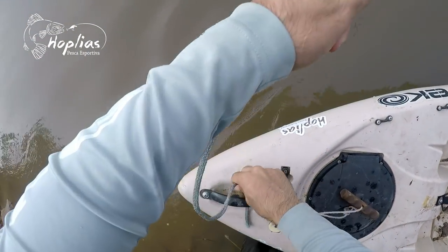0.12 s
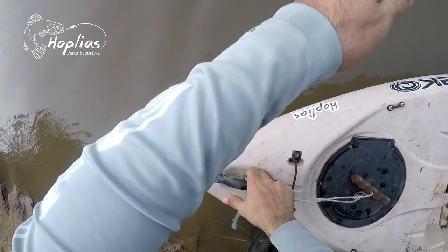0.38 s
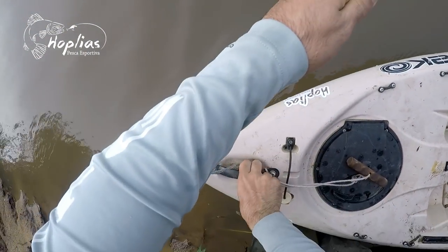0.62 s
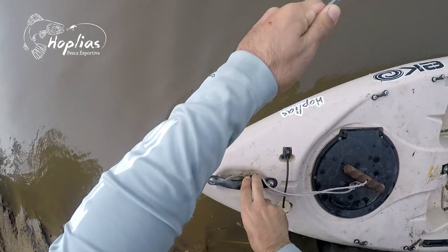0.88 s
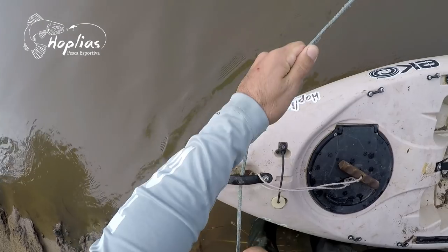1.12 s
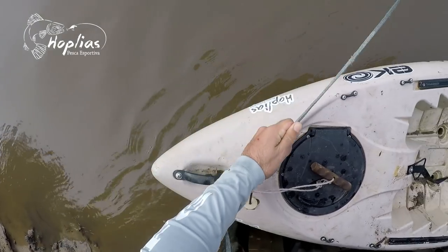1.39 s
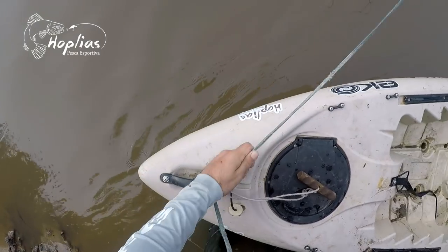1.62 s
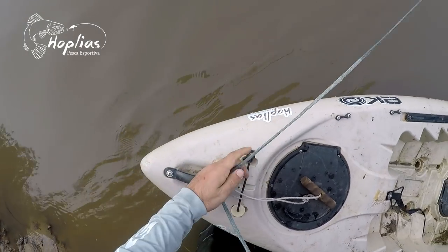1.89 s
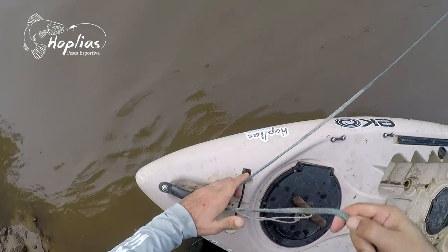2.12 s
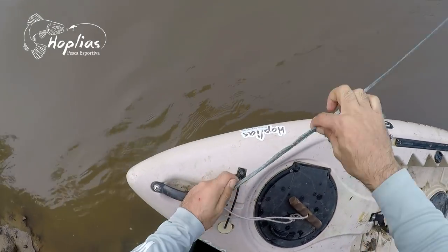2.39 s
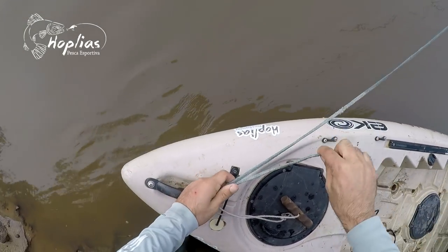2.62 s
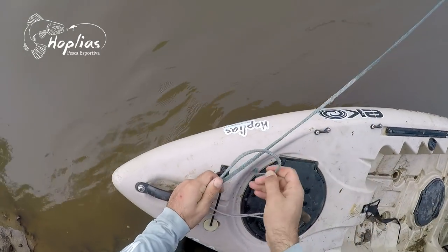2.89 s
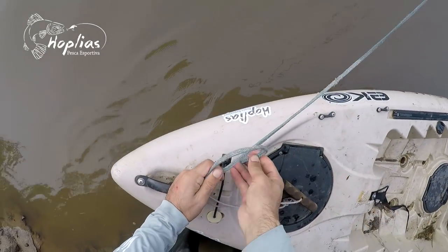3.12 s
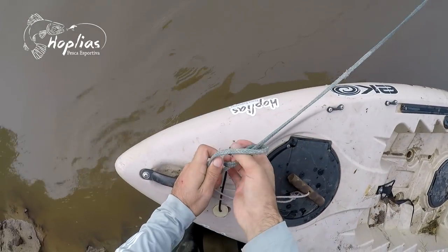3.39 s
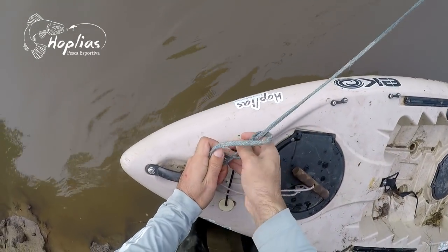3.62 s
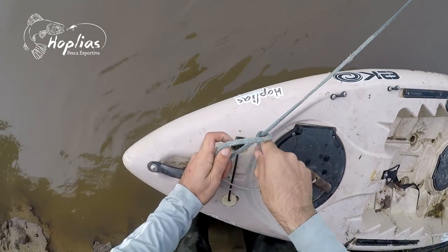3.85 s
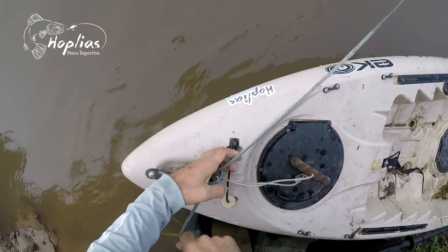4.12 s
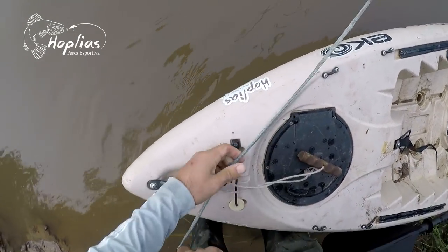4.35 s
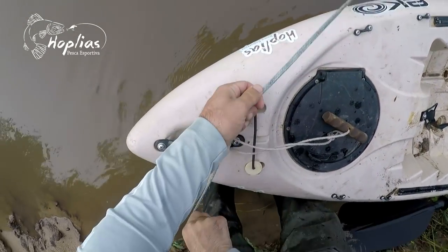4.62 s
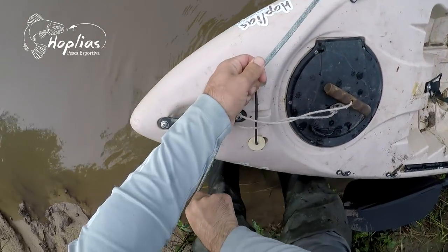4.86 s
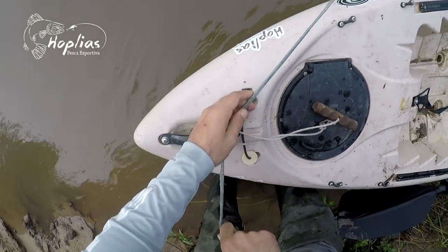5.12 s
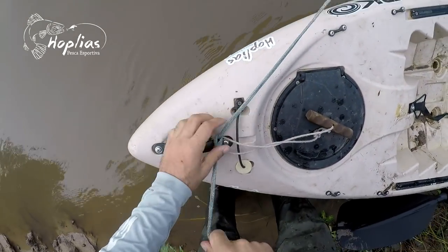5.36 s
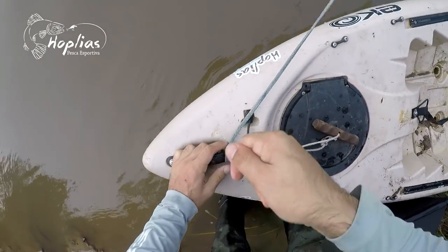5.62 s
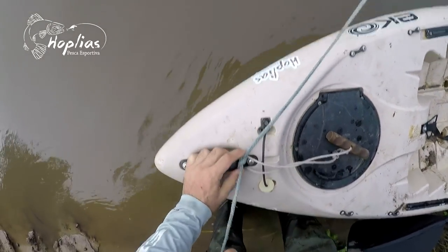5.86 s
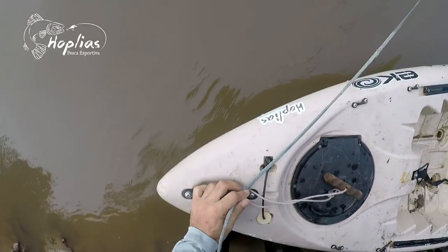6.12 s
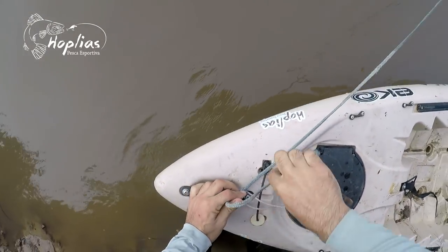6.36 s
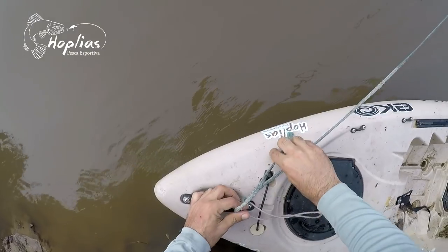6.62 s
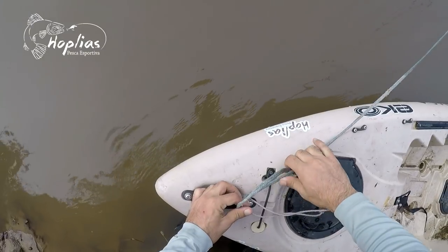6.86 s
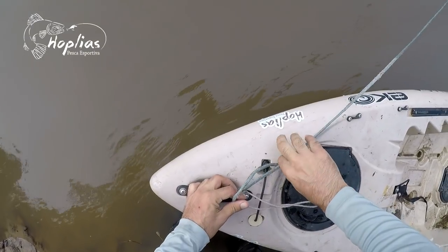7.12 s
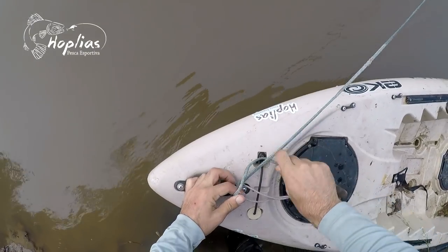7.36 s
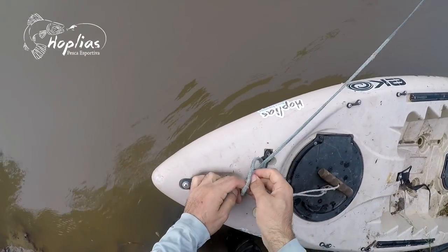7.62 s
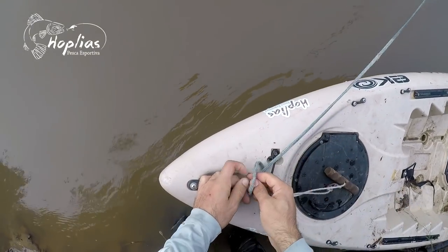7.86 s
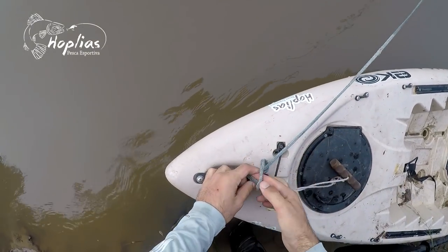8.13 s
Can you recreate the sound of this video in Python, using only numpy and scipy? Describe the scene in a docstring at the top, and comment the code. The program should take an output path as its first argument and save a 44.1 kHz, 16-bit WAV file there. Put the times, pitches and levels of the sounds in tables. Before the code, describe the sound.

A quiet riverbank in open air, heard through a sealed body-worn microphone: low, soft river hush, a very faint insect band and slight deep rumble that settles. At 0.06 s a small bird whistle arches up and down. From 0.5 to 3 s there are muffled bumps, a hollow hull knock near 0.95, a soft rope rub at 1.1-1.35, and ticks and knocks around 1.6 and 2.3. A crisp plastic click falls at 3.4, rope scuffs near 3.9. Heavy boxy thumps hit at 4.1 and hardest at 4.3, then 5.1, with a hollow knock at 4.7. From 5.5 to 6.1 jolts crowd into a lumpy rumble with scraping and clicks; bright clinks at 5.9 and 6.2. Then calmer: hull knocks at 6.3 and 7.0, faint chirps at 6.4-6.9, a flurry of light ticks at 7.2-7.65, and soft bumps to just past 8.

```python
"""A quiet river bank, where hands thread and knot a rope on a plastic kayak, heard by a body-worn camera.
Jolts and tremor of the camera housing are decaying modes; hollow knocks are modes of the hull.
Ticks, clinks and rubbing of the rope are strikes, rattles and crackling noise through resonances.
Birds are gliding tones; river, far insects and a deep rumble are filtered noise."""
import sys
import numpy as np
from scipy import signal
from scipy.fft import rfft, irfft
from scipy.io import wavfile
from scipy.ndimage import uniform_filter1d

SR = 44100
rng = np.random.default_rng(int(sys.argv[2]) if len(sys.argv) > 2 else 0)


def transcribe(u):
    """Save the signal u as a 16-bit wav file named by the first command-line argument.

    u: samples, shape (n,) or (channels, n), limited to [-1, 1]; the rate is SR.
    q: integer samples, one column per channel.
    """
    v = np.clip(np.atleast_2d(u).T, -1, 1)
    q = np.round(v * 32767).astype(np.int16)
    wavfile.write(sys.argv[1], SR, q)


def to_linear_factor(level_db):
    """Convert decibel levels (scalar or array-like) to linear amplitude factors."""
    exponent = np.asarray(level_db, float) / 20
    return 10 ** exponent


N = 363384

# Modes of the camera housing. Each row: nominal frequency in Hz, 60 dB decay time in seconds,
# right level in dB, left level in dB, left phase lag in radians. From the fifth row on: upper modes.
HOUSING = [(165.4, 0.054, -11, -12.5, 1.24), (229.9, 0.05, 2, -8, 1.92), (294.7, 0.039, -0.5, -9.5, 1.96),
           (390, 0.042, -7.5, -7, 3.78), (596, 0.02, -3.5, -4, 3.02), (724, 0.012, -3.5, -5, 2.88),
           (886, 0.0096, -2.5, -4.5, 2.96), (1201, 0.012, -9.5, -12, 2.87), (1800, 0.007, -19, -14.5, 3.12)]
# The microphone pair for sound from the air. Each row: frequency in Hz, likeness of the two sides (0-1),
# phase lead of the right in radians, left-to-right level in dB.
PORTS = [(60, .2, 1.5, -2), (170, .4, 2.1, -4.5), (340, .3, 2.7, -2), (600, .85, 3.1, -1.5),
         (1100, .8, 3.25, -.4), (2000, .35, 3.9, 0), (3000, .3, 5.6, .3), (3900, .6, 6.3, -.7),
         (5200, .2, 9.2, -.7), (8500, .05, 9.2, -2.5)]


def evened(x):
    """Normalisation to an rms of 1."""
    return x / np.sqrt(np.mean(x ** 2) + 1e-20)


def read(hz, points, column=1):
    """Linear interpolation of a table column along a logarithmic frequency axis."""
    points = np.array(points)
    return np.interp(np.log(hz + 1), np.log(points[:, 0] + 1), points[:, column])


def add(mix, s, sound, pan_db=0):
    """Superposition of a sound at time s, with pan_db of left-to-right level difference."""
    part = mix[:, round(s * SR):][:, :sound.shape[-1]]
    sides = to_linear_factor([[pan_db / 2], [-pan_db / 2]])
    part += (sides * sound)[:, :part.shape[1]]


def sparks(per_s, spread_db):
    """Random impulse train: clicks of random sign and exponentially spread level, a few large."""
    size = to_linear_factor(spread_db * np.minimum(rng.exponential(1, N), 4))
    sign = rng.choice([-1., 1.], N)
    return size * sign * (rng.random(N) < per_s / SR)


def detuned(shift, both, apart):
    """Modal detuning: one part shared by both sides, one for each side that shrinks for upper modes."""
    hz = np.array(HOUSING)[:, 0]
    return 1 + both * shift[0] + apart * shift[1:] * 250 / np.maximum(hz, 250)


def housing_ring(detune, rise):
    """Modal decay of the pushed housing; the two microphones shake nearly opposite ways."""
    t = np.arange(3000) / SR
    hz, t60, right_db, left_db, lag = np.transpose(HOUSING)[:, :, None]
    phase = 2 * np.pi * hz * detune[..., None] * t
    fade = to_linear_factor(-60 * t / t60) * (1 - np.exp(-t / rise))
    fade *= 1 + 1.5 * np.exp(-t / .008)  # the first swing is the hardest
    left = to_linear_factor(left_db) * np.sin(phase[0] - lag)
    right = to_linear_factor(right_db) * np.sin(phase[1])
    rings = np.array([left, right]) * fade
    low, high = rings[:, :4].sum(1), rings[:, 4:].sum(1)
    # unit peak midway between the sides; the floor guards upper modes that cancel there
    high_peak = max(abs(high.mean(0)).max(), abs(high).max() / 5)
    return low / abs(low.mean(0)).max(), high / high_peak


def jolts():
    """Impulsive excitation of the housing modes: a slower push excites the upper modes less."""
    # Clear thumps. Each row: start in seconds, peak of the lower modes in dB, upper modes in dB on top.
    thumps = [(0.059, -42, -9), (0.075, -37.5, -34), (0.485, -34, -12), (0.617, -34.5, -14),
              (0.651, -32.5, -16), (0.674, -28, -22), (0.697, -37.5, -12), (0.916, -32, -15),
              (1.039, -38.5, -7.5), (1.098, -35.5, -19), (1.298, -37, -4), (1.362, -30.5, -11),
              (1.43, -35, -11), (1.505, -30, -14.5), (1.597, -30.5, -21), (1.794, -29.5, -7),
              (1.875, -25, -9), (1.903, -34, -10), (1.957, -44, -27), (2.036, -27, -14.5),
              (2.162, -34.5, -18), (2.252, -36, -12), (2.303, -33.5, -8.5), (2.429, -32.5, -10),
              (2.456, -27.5, -12.5), (2.591, -31, -9.5), (2.656, -32, -10), (2.794, -35.5, -24),
              (2.938, -33, -18), (3.023, -30.5, -16), (3.291, -39, -10), (3.717, -31.5, -11),
              (3.983, -30, -8.5), (4.038, -29, -9), (4.118, -13.5, -11), (4.17, -29, -12),
              (4.185, -22.5, -11.5), (4.202, -24, -19), (4.243, -40, -9), (4.263, -40, 1), (4.288, -9, -14),
              (4.298, -8, -12), (4.377, -24, -11), (4.392, -21.5, -17), (4.409, -18.5, -17),
              (4.422, -27, -13), (4.452, -27.5, -12.5), (4.487, -26.5, -12), (4.527, -39, -13),
              (4.673, -30, -18), (4.718, -26, -15), (4.834, -30, -17.5), (4.893, -26, -12.5),
              (4.911, -28, -12.5), (4.944, -29, -12.5), (5.084, -33, -15), (5.127, -13.5, -9.5),
              (5.216, -30, -15), (5.267, -19, -9), (5.318, -34, -13), (5.412, -32.5, -21),
              (5.443, -33.5, -18), (5.456, -33, -13), (5.488, -20.5, -5), (5.596, -25, -17),
              (5.611, -11, -15), (5.63, -19, -11), (5.649, -24, -12), (5.674, -27, -17), (5.685, -17, -20),
              (5.699, -19, -18), (5.714, -20, -25), (5.736, -17, -11), (5.793, -21.5, -14), (5.813, -9, -7),
              (5.834, -15.5, -17), (5.847, -19.5, -13), (5.875, -27, -13), (5.89, -28, -3),
              (5.902, -21.5, -15), (5.914, -21, -13), (5.937, -36, -4), (5.952, -17.5, -15),
              (5.982, -11, -16.5), (5.994, -11.5, -15), (6.044, -23, -18), (6.068, -18, -16),
              (6.097, -25, -17), (6.113, -29.5, -16), (6.547, -30, -6), (6.596, -28, -15),
              (6.655, -29.5, -11), (6.721, -32.5, -7.5), (6.752, -34, -16), (6.855, -40, -26),
              (6.986, -33.5, -13), (7.096, -28.5, -11.5), (7.156, -33.5, -20), (7.212, -33, -20),
              (7.307, -29, -9.5), (7.387, -32, -11), (7.556, -35, -14), (7.764, -31.5, -9.5),
              (8.038, -32.5, -13), (8.087, -35, -14), (8.133, -32.5, -11), (8.171, -29.5, -13)]
    out = np.zeros((2, N))
    shifts = rng.standard_normal((len(thumps), 4, len(HOUSING)))
    for (s, db, upper_db), shift in zip(thumps, shifts):
        rise = 0.0018 * to_linear_factor(-.6 * (upper_db + 1.0))
        low, high = housing_ring(detuned(shift[:3], 0.084, 0.035), rise)
        pan_db = -3 + 3 * shift[3, 0]
        add(out, s, to_linear_factor(db) * (low + to_linear_factor(upper_db) * high), pan_db)
    return out


def tremor():
    """Convolution of dense random pushes with the housing modes gives a lumpy rumble."""
    # Course of the rumble. Each row: time in seconds, level in dB.
    course = [(0.0, -46.5), (0.34, -63.5), (0.82, -41.5), (1.05, -46.5), (1.86, -50), (1.97, -40),
              (3.26, -63), (3.69, -49.5), (4.01, -39), (4.07, -47), (4.1, -26.5), (4.16, -37.5),
              (4.27, -28), (4.4, -28.5), (4.53, -39.5), (4.7, -35), (5.12, -45.5), (5.3, -39), (5.42, -33),
              (5.53, -36.5), (5.58, -39), (5.665, -36), (5.72, -24), (5.77, -31), (5.9, -27), (5.94, -32),
              (6.0, -26), (6.035, -32.5), (6.09, -29.5), (6.135, -39.5), (6.4, -44), (6.54, -41.5),
              (7.0, -57), (7.48, -41.5), (7.82, -49.5), (8.06, -70), (8.24, -37)]
    out = np.zeros((2, N))
    for shift in rng.standard_normal((4, 3, len(HOUSING))):
        shared = sparks(90, 4.5)
        pushes = np.array([0.8 * shared + 0.96 * sparks(110, 4.5), shared])
        rings = housing_ring(detuned(shift, 0.065, 0.071), rise=0.0012)
        low, high = (evened(signal.oaconvolve(pushes, ring, axes=1)[:, :N]) for ring in rings)
        out += low + to_linear_factor(-9.5) * high
    s, db = np.transpose(course)
    level = to_linear_factor(np.interp(np.arange(N) / SR, s, db))
    return level * out / 2  # four layers add up to twice the rms


def knocks():
    """Modal radiation of the hollow hull, in phase at both microphones; the rope bounces a few times."""
    # Strikes. Each row: start in seconds, peak in dB, base frequency in Hz, left-to-right level in dB.
    strikes = [(0.953, -27, 528, -1), (0.967, -38.5, 550, 3), (1.58, -33.5, 596, 4), (1.586, -32, 408, 6),
               (1.607, -40.5, 490, 2), (2.117, -33.5, 445, 3), (2.288, -28.5, 445, 5),
               (2.296, -39, 692, -3), (3.408, -44.5, 523, 5), (4.09, -30, 563, -2), (4.455, -32, 392, 0),
               (4.695, -24.5, 537, 2), (6.198, -38, 537, -2), (6.323, -31, 493, 2), (6.338, -38, 480, -3),
               (6.366, -29, 399, 5), (6.987, -26.5, 451, 7), (7.022, -34, 390, 7)]
    # Hull modes. Each row: multiple of the base frequency, level in dB, 60 dB decay time in seconds.
    hull = [(0.998, 3, 0.043), (1.2, -13.5, 0.095), (1.45, -9, 0.012), (2.2, -23, 0.089), (3.1, -5, 0.0043),
            (4.4, -25, 0.011)]
    out, t = np.zeros((2, N)), np.arange(3000) / SR
    chances = rng.random((len(strikes), 5, 2))
    for (s, db, hz, pan_db), bounces in zip(strikes, chances):
        ring = sum(to_linear_factor(a - 60 * t / t60) * np.sin(2 * np.pi * hz * k * t) for k, a, t60 in hull)
        ring = ring[None] * (1 - np.exp(-t / .0009))
        ring = ring / abs(ring).max()
        add(out, s, to_linear_factor(db) * ring, pan_db)
        for late, size in bounces:  # later bounces are weaker
            add(out, s + .005 + .035 * late, to_linear_factor(db - 7 - 16 * late) * size * ring, pan_db)
    return out


def snap(rattle, hz, width_hz, tail_db):
    """Resonant filtering of a strike and a short dying rattle, scaled to unit peak."""
    snap_s, tail_t60_s = .0008, 0.042
    t = np.arange(rattle.shape[1]) / SR
    dying = np.exp(-((t - snap_s) / snap_s) ** 2) + to_linear_factor(tail_db - 60 * t / tail_t60_s)
    ring = (rattle[0] + .5 * rattle[1:]) * dying * (1 - np.exp(-t / 0.0003))
    ring[:, round(snap_s * SR)] += 9  # the clean strike inside the rattle
    r = np.exp(-np.pi * 1.3 * max(width_hz, 50) / SR)  # pole radius
    for zeros in [1, -1], [1]:  # twice, for steep flanks
        ring = signal.lfilter(zeros, [1, -2 * r * np.cos(2 * np.pi * hz / SR), r * r], ring)
    return ring / abs(ring.mean(0)).max()


def ticks():
    """Broad resonance of plastic struck by rope, buckle and fingers, with a bright edge on top."""
    # Contacts. Each row: start in seconds, peak of the body in dB, centre in Hz,
    # bright edge in dB on top of that, left-to-right level in dB.
    contacts = [(0.059, -49, 1600, -7, -2), (0.645, -47, 2060, -6, -2.5), (0.9183, -45, 1920, -10, -12),
                (0.9532, -47, 2250, -6, -20), (1.545, -41.5, 1000, -25, 0), (1.559, -40, 2780, -21, -2),
                (1.8202, -41, 3680, -8, -7), (1.886, -39.5, 1710, -22, 2), (1.982, -53, 1800, -20, 0),
                (2.11, -44, 1880, -11, -10), (2.2614, -37, 1430, -9, -2), (2.2724, -33.5, 1860, -4.5, -11),
                (2.2864, -40, 2040, -3, -10), (2.6928, -43, 3300, -18, -9), (3.2767, -36.5, 3500, -19, 0),
                (3.195, -43, 1790, -15, 0), (3.396, -49, 2100, -25, 0), (3.4053, -28, 2380, -22, 1.0),
                (3.4108, -37.5, 2560, -25, 1), (4.083, -33, 3230, -8, -4), (4.091, -41, 3400, 0, 1),
                (4.119, -32.5, 1880, -0.5, -8), (4.1723, -41, 1540, -19, -1),
                (4.2888, -35.5, 1520, 3.5, -12), (4.3679, -30.5, 1500, -12.5, -6),
                (4.575, -32, 1790, -22, -1), (4.693, -38, 2100, -12, 0), (4.6983, -32.5, 2200, -7, -7),
                (4.704, -39, 2290, -10, -5), (5.012, -39, 1800, -24, 3), (5.0095, -37, 3070, -29, -5),
                (5.129, -33.5, 1530, 1.5, -10), (5.2673, -33, 1920, -5.5, 0),
                (5.3082, -32.5, 3130, -24, -3), (5.308, -33.5, 2100, -25, 5), (5.334, -55, 4200, -6, 0),
                (5.3624, -34, 3250, -23, 1.5), (5.375, -33, 1370, -16, 2), (5.3954, -37, 3700, -12, -1.0),
                (5.405, -40, 1460, -0.5, 1), (5.485, -48, 4180, 0, 2), (5.4902, -32, 1870, -2.5, -8),
                (5.612, -35.5, 1820, -12, 6), (5.7375, -36, 1700, -6, -14), (5.7718, -52, 1490, 8, 0),
                (5.8046, -32, 2100, -8, -6), (5.815, -27.5, 2350, -9, -4), (5.834, -44.5, 2300, 7, -11),
                (5.9826, -31.5, 1250, -1.5, -10), (5.995, -34, 1800, -15, 0), (6.1578, -40, 1440, -3, 2),
                (6.198, -31, 1800, -15, -10), (6.302, -46, 4200, -5, 0), (6.475, -45, 3600, -8, 0),
                (6.483, -40, 1280, -14, -4), (6.5553, -39.5, 1760, -4, -1), (6.758, -44, 2700, -20, 0),
                (6.782, -45, 3000, -25, -4), (6.9855, -47, 2000, -6, -2), (7.019, -51.5, 1980, 5, 0.5),
                (7.247, -32.5, 2550, -3, 0), (7.2893, -40, 2000, -3.5, 3), (7.3358, -39.5, 2000, -11, -2.0),
                (7.343, -38, 3700, -17, -2), (7.3565, -50, 3600, -15, -2), (7.373, -48, 3400, -12, 0),
                (7.4124, -41, 2700, -4, 4), (7.418, -36, 2900, -12, -1), (7.428, -41, 3740, -17, 1),
                (7.45, -49, 3500, -20, 0), (7.4747, -39, 1870, -17, -1.5), (7.4983, -45, 3870, -9, -6),
                (7.505, -54, 3900, 0, -3), (7.5215, -35.5, 3000, -4, -1), (7.5985, -46, 3900, -3, -1),
                (7.6046, -35.5, 1330, -17, 2), (7.612, -43, 2400, -15, 0), (7.6222, -33, 2400, -28, -3),
                (7.646, -44, 1700, -9, 0), (7.841, -38, 1920, -10, -5), (8.208, -37.5, 1820, -18, -2)]
    # Bright edge. Each row: centre in Hz, nominal width in Hz, level in dB.
    edge_bands = [(3700, 540, -8), (6500, 1700, 3), (9300, 670, -11.5)]
    out = np.zeros((2, N))
    rattles = rng.standard_normal((len(contacts), 1 + len(edge_bands), 3, 1500))
    for (s, db, hz, edge_db, pan_db), rattle in zip(contacts, rattles):
        edge = sum(to_linear_factor(a) * snap(r, f, w, tail_db=-7.5) for r, (f, w, a) in zip(rattle[1:], edge_bands))
        body = snap(rattle[0], hz, 0.55 * hz, tail_db=-3.5)
        add(out, s, to_linear_factor(db) * (body + to_linear_factor(edge_db) * edge), pan_db)
    return out


def clinks():
    """Narrow resonance of small hard fittings, which gives each strike a pitch."""
    # Strikes. Each row: start in seconds, peak in dB, pitch in Hz, left-to-right level in dB.
    fittings = [(1.558, -43, 1610, -2), (1.822, -48, 3900, -5), (0.646, -46, 2300, -2),
                (2.213, -48, 2000, -5), (4.368, -40.5, 1750, -4), (4.672, -43, 1520, -10),
                (5.8143, -32, 2400, -2), (5.862, -41, 6000, 6), (5.873, -34, 6000, 4),
                (5.882, -30, 6140, 10), (6.213, -40, 6000, 10), (6.225, -26, 5840, 5),
                (6.711, -47, 3700, 0), (7.4278, -49, 3870, 2), (7.5222, -31.5, 1490, -2)]
    out = np.zeros((2, N))
    rattles = rng.standard_normal((len(fittings), 3, 1500))
    for (s, db, hz, pan_db), rattle in zip(fittings, rattles):
        add(out, s, to_linear_factor(db) * snap(rattle / 4, hz, .16 * hz, tail_db=-7.5), pan_db)
    return out


def rub():
    """Stick-slip friction: braid strands catch on edges in a dense crackle with uneven clumps."""
    # Rope and cloth strokes. Each row: start in seconds, end in seconds, rms level in dB,
    # centre in Hz, half-width of the colour in octaves.
    strokes = [(0.632, 0.675, -58.5, 2160, 0.86), (0.741, 0.834, -53.5, 5000, 3.6),
               (0.927, 0.958, -56, 3000, 4.9), (1.12, 1.344, -46.5, 1100, 0.69),
               (1.104, 1.36, -60, 4000, 1.2), (1.477, 1.665, -58, 2960, 1.2), (2.1, 2.125, -53, 2500, 4.4),
               (2.261, 2.31, -54, 1800, 5.9), (2.82, 2.866, -58.5, 5500, 1),
               (5.132, 5.282, -60, 4000, 0.77), (3.28, 3.306, -61, 2500, 2.3),
               (3.833, 3.965, -50.5, 2500, 5.1), (3.932, 4.012, -49, 2500, 4.6),
               (4.069, 4.115, -43.5, 3480, 3.1), (4.168, 4.244, -55, 3500, 1.7),
               (4.367, 4.44, -45.5, 1290, 0.56), (5.258, 5.465, -58.5, 3380, 1.2),
               (5.68, 5.804, -52.5, 1200, 2.1), (5.77, 5.88, -44, 1300, 0.71),
               (5.884, 5.934, -54.5, 2000, 2.3), (5.96, 6.12, -61, 1090, 1.7),
               (6.126, 6.263, -61, 4500, 1.1), (6.63, 6.8, -60.5, 3000, 1.6),
               (7.33, 7.377, -58.5, 3000, 1.1), (7.402, 7.443, -57.5, 3400, 0.53),
               (7.488, 7.516, -52, 3000, 3.8), (7.577, 7.65, -57, 2200, 2.4),
               (7.827, 7.858, -55, 2500, 2.6), (8.19, 8.236, -55.5, 3000, 1.8)]
    shared = sparks(1600, 4.5)
    grains = np.array([shared + .6 * sparks(2500, 3.5) for _ in range(2)])
    grains *= to_linear_factor(3.5 * evened(uniform_filter1d(rng.standard_normal(N), 250)))
    grains = evened(grains)
    hiss = evened(rng.standard_normal(N) + rng.standard_normal((2, N)) / 2)
    out = np.zeros((2, N))
    for start, end, db, centre_hz, octaves in strokes:
        smoothness = (centre_hz / 4500) ** 3 + (end - start) / .13  # long or bright strokes slide smoothly
        span = slice(round(start * SR), round(end * SR))
        part = grains[:, span] + smoothness * hiss[:, span]
        hz = np.fft.rfftfreq(part.shape[1], 1 / SR) + 1
        colour = np.exp(-(np.log2(hz / centre_hz) / octaves) ** 2)
        colour *= 0.33 / (1 + (hz / 11000) ** 6) + 1 / (1 + (hz / 7700) ** 12)
        lead = np.minimum(read(hz, PORTS, column=2), 2 * np.pi)  # close treble arrives in step
        ports = np.exp([[-1j], [0]] * lead)
        stroke = evened(irfft(rfft(part) * colour * ports, part.shape[1]))
        add(out, start, to_linear_factor(db) * stroke * signal.windows.tukey(part.shape[1], .75))
    return out


def whistle(out, s, hz, db, ends_db, swell):
    """Frequency modulation: a sine of gliding pitch, softer at both ends, with one soft echo."""
    tone = np.sin(2 * np.pi * np.cumsum(hz) / SR)
    level = to_linear_factor(db + ends_db * (1 - swell) ** 1.07)
    call = (level * tone * signal.windows.tukey(len(hz), .12))[None]
    add(out, s, call, -1.5)
    add(out, s + 0.01, 0.27 * call, 3)


def birds():
    """Near-pure tones of gliding frequency: straight chirps, and whistles that climb and fall back."""
    # Chirps, most of them falling. Each row: start in seconds, length in seconds,
    # first frequency in Hz, last frequency in Hz, peak in dB.
    chirps = [(.245, .022, 4930, 4230, -65), (3.562, 0.023, 7900, 5030, -56), (4.51, .025, 6100, 4100, -61),
              (4.785, 0.021, 6000, 4440, -55), (4.885, 0.11, 7000, 6530, -63),
              (6.38, 0.045, 3630, 2880, -60), (6.686, 0.034, 3300, 2700, -58),
              (6.754, 0.016, 2730, 3100, -58), (6.75, .03, 3400, 3130, -62),
              (6.811, 0.028, 2850, 3350, -59), (6.842, 0.034, 3330, 2870, -60),
              (7.72, 0.015, 7300, 6000, -54)]
    # Arched whistles. Each row: start in seconds, length in seconds, foot in Hz, nominal top in Hz, peak in dB.
    arches = [(.056, 0.172, 2200, 3370, -51.5)]
    peak = .4  # loudest and highest point as a share of the length
    out = np.zeros((2, N))
    for rows, ends_db in ((chirps, -5), (arches, -19)):
        for s, length, first_hz, far_hz, db in rows:
            u = np.arange(0, length, 1 / SR) / length
            swell = np.interp(u, [0, peak, 1], [0, 1, 0])
            if rows is chirps:
                glide = u
            else:  # exponents over 1 let the pitch linger at the foot, more so on the fall
                pointed = np.interp(u, [peak, 1.56 * peak], (1.1, 1.4))
                glide = uniform_filter1d(swell, len(u) // 6) ** pointed
            whistle(out, s, first_hz + (far_hz - first_hz) * glide, db, ends_db, swell)
    return out


def hush():
    """Partially coherent noise: river and a band of far insects, gently patchy, at two microphone ports."""
    # River spectrum. Each row: frequency in Hz, relative level per hertz in dB.
    river_curve = [(76, -40), (130, 6.5), (644, -10), (771, -12), (980, -12.5), (1110, -13), (1350, -15.5),
                   (1550, -16), (3390, -21.5), (3820, -22.5), (5160, -20.5), (12000, -29.5), (15500, -46)]
    # Insect band: centre in Hz, half-width in Hz, rms level in dB.
    insect_band = (5130, 270, -72.5)
    river_db = -50.5
    frames, hz = N // 256 + 5, np.fft.rfftfreq(1024, 1 / SR)[:, None]
    a, b, c, d, patches = rng.standard_normal((frames, 513, 5)).T
    patches = evened(uniform_filter1d(uniform_filter1d(patches, 12, 0), 10, 1))
    same = np.clip(read(hz, PORTS), 0, 1)
    lead = read(hz, PORTS, column=2)
    tilt = to_linear_factor(read(hz, PORTS, column=3))
    right = a + 1j * b
    left = tilt * (same * right * np.exp(-1j * lead) + np.sqrt(1 - same ** 2) * (c + 1j * d))
    # equal power in the sum of both sides at every frequency
    pair = np.array([left, right]) / np.sqrt(1 + tilt ** 2 + 2 * same * tilt * np.cos(lead))
    centre_hz, width_hz, insects_db = insect_band
    river_shape = to_linear_factor(read(hz, river_curve) + 1.5 * patches)
    insect_shape = np.exp(-((hz - centre_hz) / width_hz) ** 2 + 0.049 * patches)
    river, insects = (signal.istft(pair * shape, nperseg=1024, noverlap=768)[1][:, :N]
                      for shape in (river_shape, insect_shape))
    return to_linear_factor(river_db) * river / river.mean(0).std() + to_linear_factor(insects_db) * evened(insects)


def deep():
    """Low-passed noise: slow lumpy air pressure, unrelated at the two ports, that settles."""
    lumps = signal.sosfilt(signal.butter(2, 35, fs=SR, output="sos"), rng.standard_normal((2, N)))
    level_db = -76 + 16.5 * np.exp(-np.arange(N) / SR / 1.6)
    return to_linear_factor(level_db) * evened(lumps)


def dull(x):
    """Low-pass filtering: the sealed microphones lose the highest treble."""
    return signal.sosfilt(signal.butter(3, 14000, fs=SR, output="sos"), x)


def low_cut(x):
    """High-pass filtering: the camera's steep wind filter, past which a trace of deep bass leaks."""
    leak = signal.sosfilt(signal.butter(4, 85, fs=SR, output="sos"), x)
    return signal.sosfilt(signal.cheby2(8, 45, 112, "high", fs=SR, output="sos"), x) + to_linear_factor(-24) * leak


def scene():
    """Linear superposition of the sources at the two microphones."""
    return jolts() + tremor() + knocks() + ticks() + clinks() + rub() + birds() + hush()


def top_cut(x):
    """Nothing passes above the cut-off."""
    return signal.sosfilt(signal.butter(12, 16340, fs=SR, output="sos"), x)


def record(dry):
    """Filtering, the rumble added after the wind filter, and saturation: soft overload on hard jolts."""
    filtered = low_cut(dull(dry))
    mix = np.tanh(filtered + deep())
    return top_cut(mix)


dry = scene()
out = record(dry)
transcribe(out)
```